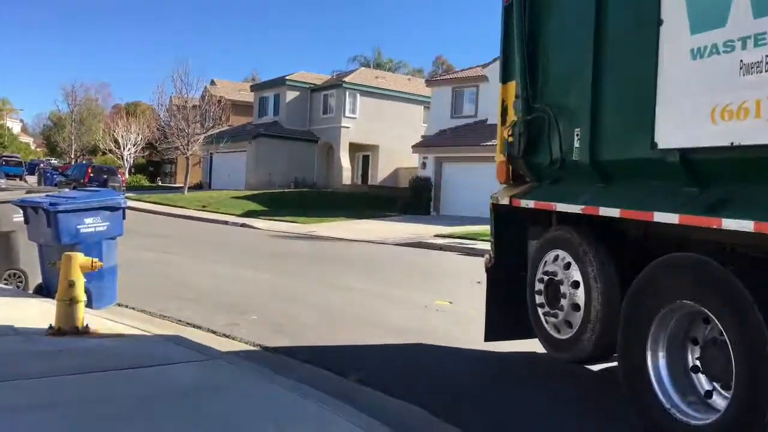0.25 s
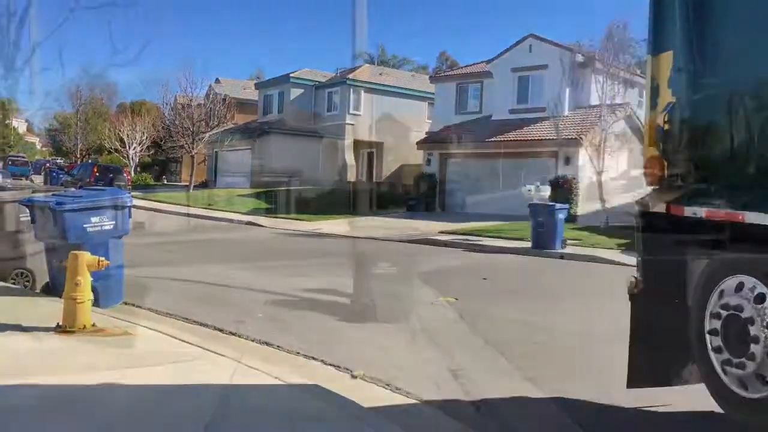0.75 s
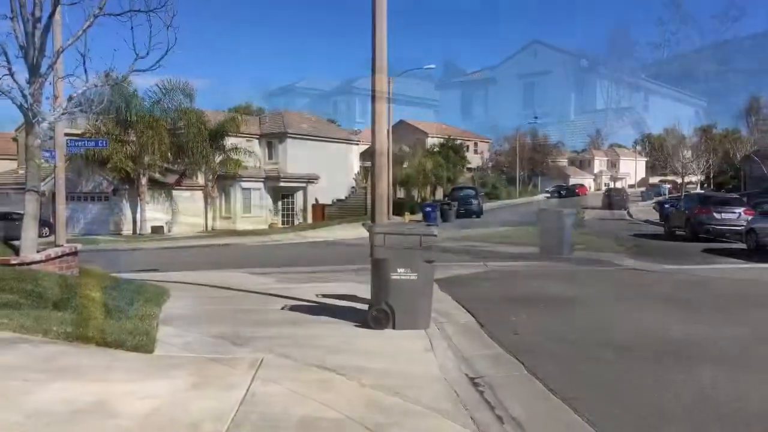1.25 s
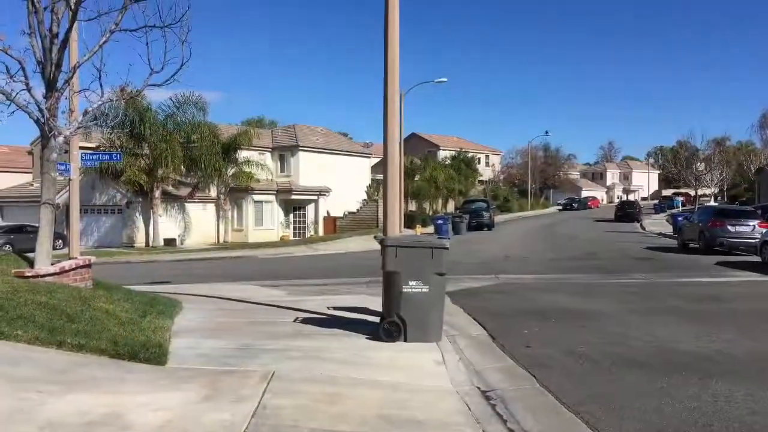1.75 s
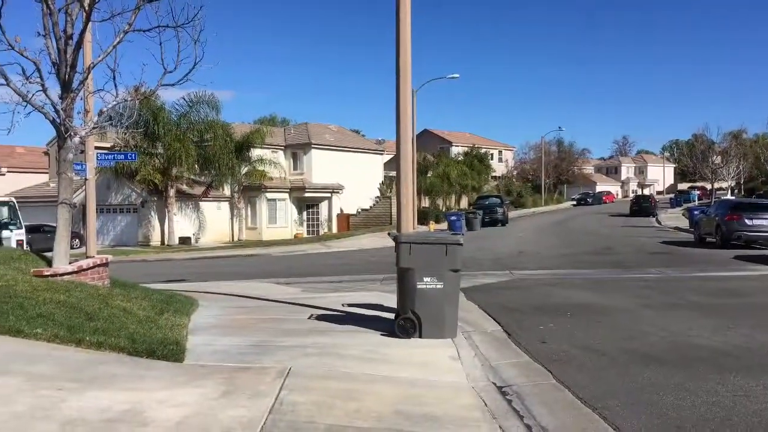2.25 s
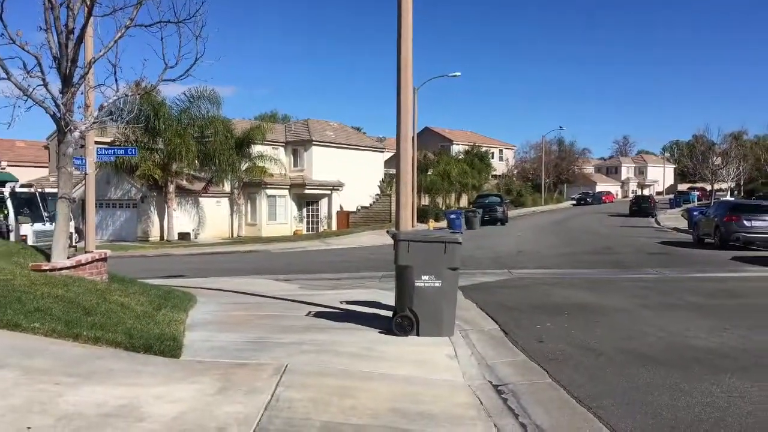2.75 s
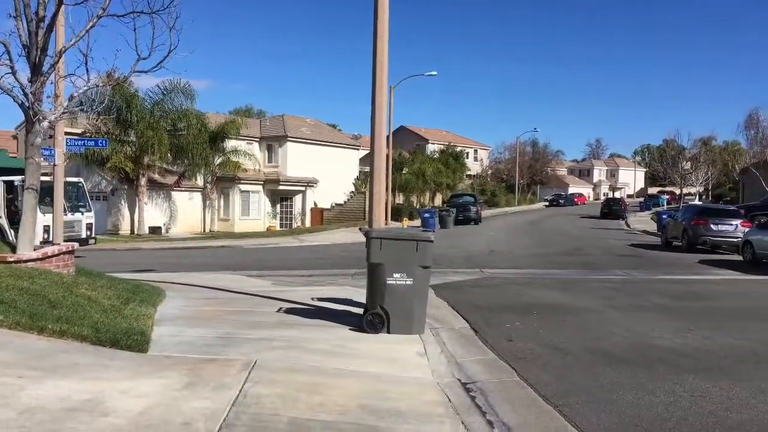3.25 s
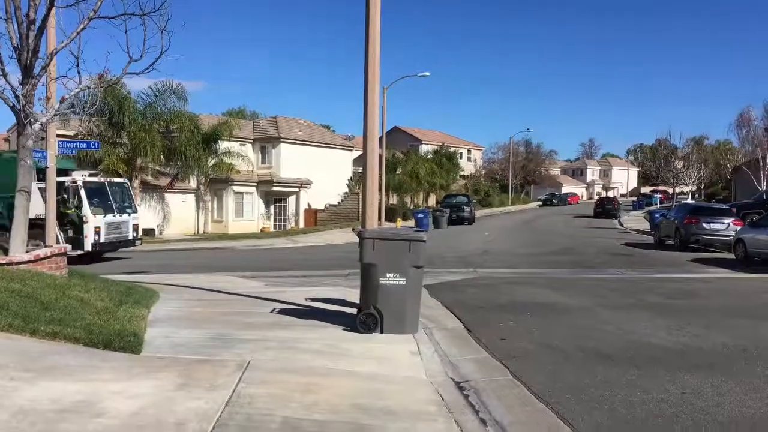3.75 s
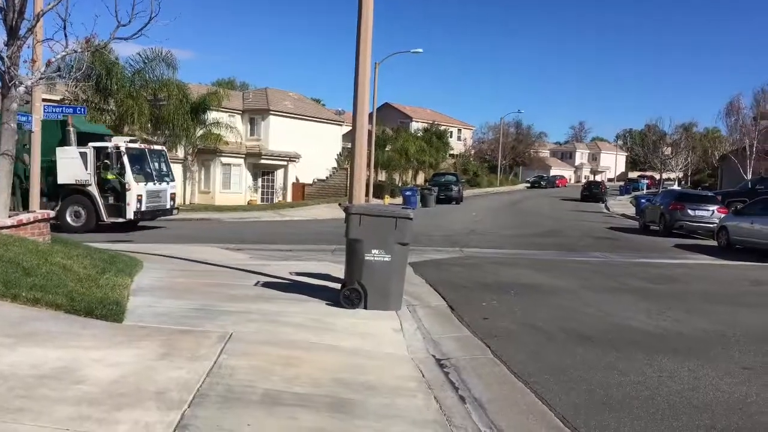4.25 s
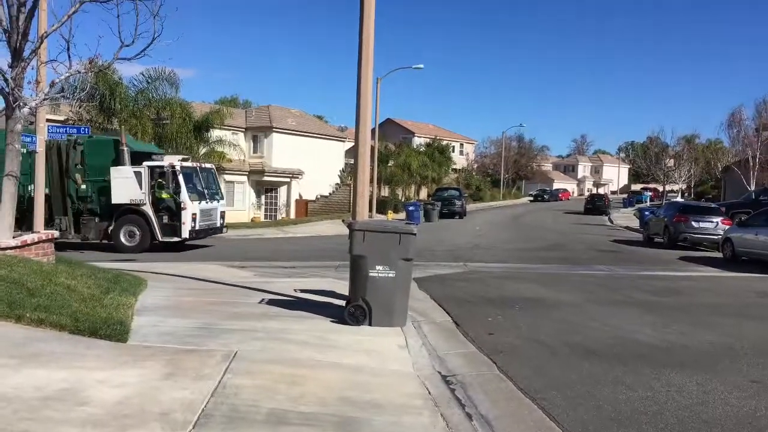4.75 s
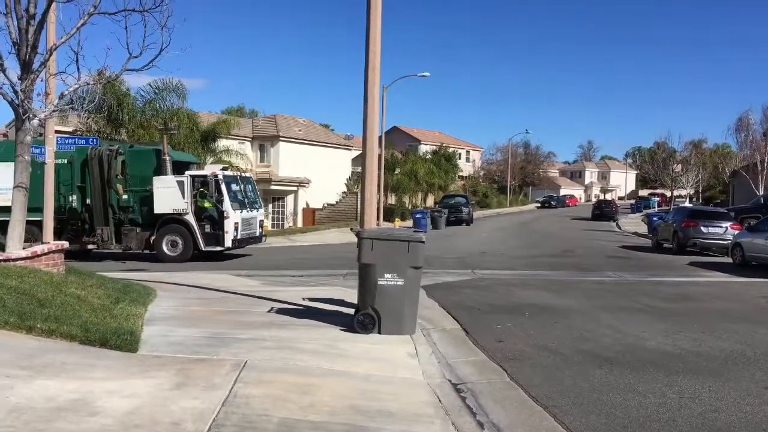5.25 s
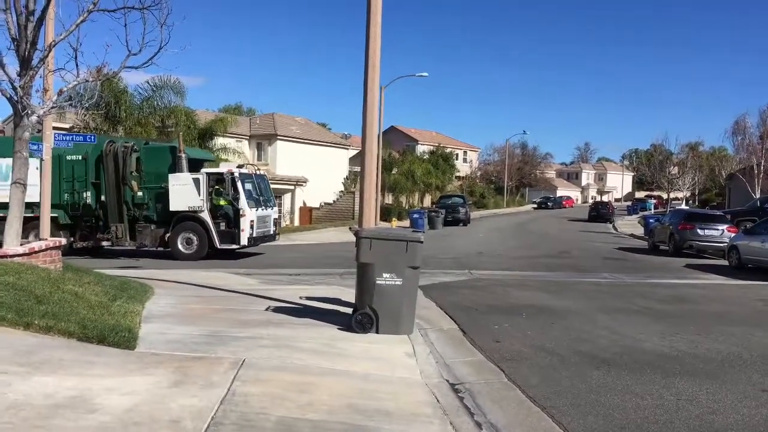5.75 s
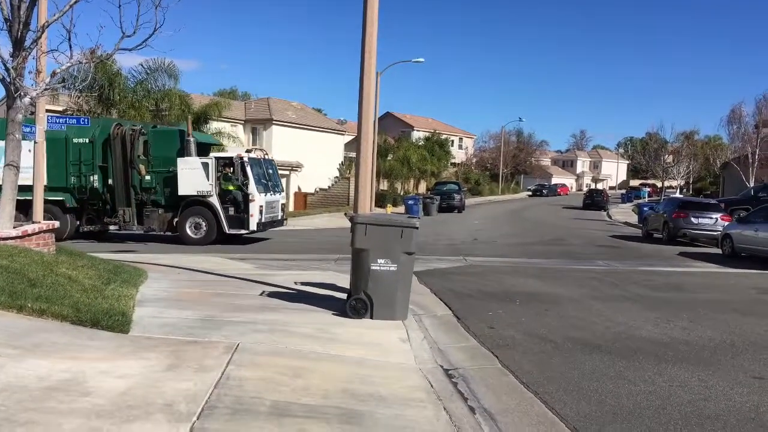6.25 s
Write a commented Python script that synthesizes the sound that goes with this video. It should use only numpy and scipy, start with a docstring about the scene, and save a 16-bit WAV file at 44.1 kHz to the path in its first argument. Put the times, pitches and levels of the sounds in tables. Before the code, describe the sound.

Close throbbing truck engine with hydraulic whine dissolves into a quieter distant diesel rolling up on a street, ending with a sharp air-brake hiss.

```python
"""A street, heard by microphone: a six-cylinder refuse truck revs up close by and fades out while
a second scene fades in: a truck engine farther off coasts, revs and rolls on.
Exhaust orders and knock follow the engine speed; the far rumble is noise with its own level curve.
Pump, gears and turbo whine as wandering tones, the body creaks by stick-slip, brakes squeal and vent air.
A low neighbourhood hum of filtered noise lies underneath."""
import sys
import numpy as np
from scipy import signal
from scipy.io import wavfile
from scipy.ndimage import uniform_filter1d, map_coordinates

SR = 44100
rng = np.random.default_rng(int(sys.argv[2]) if len(sys.argv) > 2 else 0)


def waveform_to_disk(signal):
    """Save audio, clipped to [-1, 1], as 16-bit WAV at the path in sys.argv[1]."""
    frames = np.transpose(np.atleast_2d(signal))
    scaled = np.clip(frames, -1, 1) * 32767
    samples = np.round(scaled).astype(np.int16)
    wavfile.write(sys.argv[1], SR, samples)


N = 286631
TIME_S = np.arange(N) / SR

# Every *_COLOUR table is a spectrum shape: pitch_hz [Hz], relative_level_db [dB per Hz].
# In held sounds start_s is when full level is reached; the attack comes before it.

# Background: low hum of the neighbourhood
STREET_COLOUR = [(35, -18), (55, -3.5), (90, 0.5), (150, -3), (220, -41)]
STREET_DB = -36.5

# Low body hum: time_s [s], pitch_hz [Hz], level_db [dB]
BODY_HUM = [(3.5, 122, -45), (3.72, 115, -35), (3.9, 107.4, -35.5), (4.08, 111, -31), (4.29, 119, -43),
            (4.74, 108.6, -27.5), (4.9, 105, -39), (5.0, 103.5, -30.5), (5.59, 109.9, -29.5),
            (6.0, 103.7, -31.5), (6.18, 100, -39), (6.5, 112.3, -28.5)]
# Drones of body and driveline: start_s [s], hold_s [s], first_hz [Hz], last_hz [Hz], level_db [dB]
DRONES = [(1.05, 0.033, 240, 233, -29), (1.28, .14, 231, 231, -29), (1.57, .1, 238, 230, -29.5),
          (4.7, .3, 217.4, 208, -43.5), (5.38, 0.46, 218, 218, -41.5), (6.06, 0.38, 202, 196, -44.5),
          (5.3, 0.3, 467.4, 453, -41), (5.67, .14, 460, 436, -49)]
# Driveline winding down: time_s [s], pitch_hz [Hz], level_db [dB]
GROAN = [(1.0, 292, -45), (1.096, 312.5, -29), (1.41, 290, -29.5), (1.72, 218.5, -29.5), (1.85, 186, -36)]
# Groan fundamental and octave: relative_level_db [dB]
GROAN_PARTIALS_DB = (-0.5, -17)
# Short metal knocks: start_s [s], level_db [dB], centre_hz [Hz], width_hz [Hz], t60_s [s]
METAL_TICKS = [(.045, -19, 9000, 14100, 0.023), (0.067, -22, 1300, 1500, 0.017),
               (1.56, -46, 5500, 3000, .05), (2.43, -50, 9000, 9000, 0.017)]
# Body creaks: start_s [s, onset], length_s [s], pitch_hz [Hz], slip_rate [slips per s], level_db [dB]
CREAKS = [(3.559, 0.16, 1188, 37, -40.5), (4.118, 0.17, 1166, 42, -41), (4.446, 0.071, 1270, 12, -36.5),
          (4.742, 0.17, 1160, 39, -39)]
# Hydraulic pump whines: start_s [s], hold_s [s], first_hz [Hz], last_hz [Hz], level_db [dB]
PUMP_WHINES = [(0, .1, 2468, 2464, -47), (0.212, 0.099, 2463, 2462, -36), (0.573, 0.33, 2458, 2453, -40.5),
               (1.02, 0.092, 2455, 2454, -43.5), (0, 1.12, 3081, 3070, -52), (0.64, .03, 3072, 3072, -42.5),
               (0.052, 0.56, 828, 826, -38.5), (0, 0.24, 1007, 1012, -38), (0.39, .45, 1013, 1010, -44)]
# Turbo whistles running down: start_s [s], hold_s [s], first_hz [Hz], last_hz [Hz], level_db [dB]
TURBO_WHISTLES = [(1.8, .16, 13200, 12650, -71), (1.99, .05, 13050, 12850, -67),
                  (2.13, .27, 12200, 11400, -69), (2.45, .28, 11350, 10950, -70),
                  (1.67, .52, 9650, 7550, -70), (2.32, .14, 7050, 6850, -69)]
# Brake squeals: start_s [s], hold_s [s], first_hz [Hz], last_hz [Hz], level_db [dB]
BRAKE_SQUEALS = [(.6, .02, 6650, 6650, -46), (2.38, .04, 9440, 9440, -63), (4.78, .56, 10170, 10240, -72),
                 (4.84, .3, 1547, 1553, -55), (4.82, .6, 1648, 1665, -59), (4.75, .65, 2725, 2742, -59),
                 (5.08, .15, 6575, 6585, -55), (5.28, .12, 6580, 6560, -67)]
# Brake air: start_s [s], hold_s [s], level_db [dB], release_s [s]
BRAKE_VENTS = [(5.471, 0.27, -33, 0.28), (6.424, 0.0092, -46.5, .1)]
VENT_COLOUR = [(1180, -46), (2000, -13), (2700, -6.5), (3070, -7), (3320, -8.5), (5360, -13), (6870, -8.5),
               (7480, -13), (7950, -4), (9030, -1.5), (9680, 1.5), (11200, -3), (12100, -6), (13500, -0.5),
               (15500, -5)]
VENT_ATTACK_S, LEAK_ATTACK_S, LEAK_DB = 0.032, 0.24, -15  # the valve leaks a little before it opens
VENT_SAG_DB_PER_S = 6.5  # the flow weakens as the tank empties

# Strength over the six firings, for knock and for valve ticks: relative_level_db [dB]
KNOCK_PATTERN_DB = [-0.5, -1.5, -2, -1, -1.8, -0.67]
VALVE_PATTERN_DB = [1.5, -9, -6, -15, -3, -21]

# Far engine: time_s [s], firing_hz [firings per s], firing_tone_db [dB before the fade-in]
FAR_ENGINE = [(1.15, 83.2, -28.5), (1.38, 79.04, -29), (1.51, 76.5, -18), (1.84, 73, -44), (1.93, 74, -40),
              (2.27, 70, -42), (2.36, 38, -40), (2.68, 45.5, -25), (2.85, 43.5, -33), (3.26, 50, -21),
              (3.46, 52, -50), (3.71, 71.5, -36), (3.81, 63.9, -56), (3.88, 61.9, -30),
              (3.96, 64.04, -36.5), (4.36, 73.06, -26.5), (4.57, 69.34, -43), (4.65, 66.03, -31.5),
              (5.05, 61.83, -35), (5.25, 63.64, -30.5), (5.7, 65.3, -25.5), (5.9, 63.8, -27.5),
              (6.0, 62, -41), (6.09, 61.2, -27), (6.4, 58.1, -27.5), (6.48, 61, -32)]
# Far exhaust orders: crank_multiple [times crank speed]
FAR_ORDERS = (1.5,)
# Far exhaust orders: level_db [dB before the fade-in]
FAR_ORDERS_DB = (-46.5,)
# Far engine noise: time_s [s], rumble_db, clatter_db, hiss_db [dB before the fade-in]
FAR_NOISE = [(1.3, -25, -37, -49), (1.62, -28, -42, -58), (2.11, -35, -49, -56.5),
             (2.39, -38.5, -49, -58.5), (2.59, -30.5, -46.5, -59.5), (3.0, -32, -47, -58.5),
             (3.2, -30, -46.5, -60.5), (3.6, -33, -48, -61), (3.9, -38, -49, -64), (4.2, -34.5, -47.5, -59),
             (4.65, -36.5, -46, -57.5), (4.9, -38, -48, -64), (5.4, -38.5, -44.5, -57.5),
             (6.27, -39, -47, -60.5), (6.5, -35, -41.5, -49)]
# Fade-in gain of the far engine: time_s [s], gain_db [dB]
FAR_FADE_IN = [(.6, -10.5), (.9, -3), (1.6, 1.5)]
# Combustion knock under load: start_s [s], hold_s [s], level_db [dB]
FAR_KNOCK = [(2.43, .18, -57), (2.97, 0.25, -55)]
# Gears of the far truck: pitch_hz [Hz], level_db [dB before the whine gain]
FAR_WHINES = [(3430, -68), (4040, -73), (3060, -68.5)]
# Gain that brings up the far gear whine: time_s [s], gain_db [dB]
FAR_WHINE_GAIN = [(3.9, -25), (4.5, -0.5)]
# Narrow patchy hiss around 6 kHz, in two spells: start_s [s], hold_s [s], level_db [dB], release_s [s]
SIZZLE = [(1.56, .05, -54.5, 0.64), (3.0, 0.28, -63, .1)]
# Spectra of the far rumble, drumming panels, clatter, hiss, valve ticks, combustion knock and sizzle
FAR_RUMBLE_COLOUR = [(20, -40), (45, -10), (80, -3.5), (130, -3), (170, -4.5), (250, -2), (330, -8),
                     (400, -12), (520, -24), (700, -49), (1100, -120)]
DRUM_COLOUR = [(300, -44), (450, -12), (600, -3), (720, -8.5), (1000, -41)]
FAR_CLATTER_COLOUR = [(410, -37), (700, -14), (803, -5), (913, -1.5), (1170, -6.5), (1420, -8), (1590, -10),
                      (1890, -13.5), (2770, -13.5), (4300, -23.5), (5590, -53), (9460, -120)]
FAR_HISS_COLOUR = [(2060, -33), (3500, 1.5), (3750, -15), (4040, -6.5), (4550, -8.5), (4870, -7.5),
                   (6130, -6), (7030, -11), (8960, -12), (10500, -15.5), (14100, -13), (15500, -17)]
VALVE_TICK_COLOUR = [(3000, -120), (4500, -14), (7000, -3), (9500, 0.5), (10500, -10), (12500, -6),
                     (15000, 0.5)]
FAR_KNOCK_COLOUR = [(3500, -28), (4800, -7), (6100, -2), (8000, -5), (9600, -6), (10500, -13), (15500, -14)]
SIZZLE_COLOUR = [(4500, -25), (5300, -2), (6200, -2), (7400, -8), (8200, -30), (9000, -120)]
KNOCK_AT_S, TICK_AT_S = 3.085, 5.2  # moments at which a knock and a tick peak
DRUM_DB, DRUM_RUMBLE_SHARE = -10, 0.5  # the panels follow a blend of rumble and clatter level
TICK_START_DB, TICK_RISE_DB_PER_S = -81, 3.5  # the valve tick grows steadily, before the fade-in

# Fade-out gain of the close truck: time_s [s], gain_db [dB]
CLOSE_FADE_OUT = [(0, -.5), (.65, -4.5), (1.1, -11.5), (1.5, -22), (1.8, -46)]
# Close exhaust orders: crank_multiple [times crank speed]
CLOSE_ORDERS = (2, 4, 4.5, 5, 6, 6.5, 8, 9, 10, 11, 12)
# Close exhaust orders: level_db [dB before the fade-out]
CLOSE_ORDERS_DB = (-50, -32, -40, -26, -25.5, -29, -31.5, -27.5, -25, -23.5, -37.5)
# Gears of the close truck: pitch_hz [Hz], level_db [dB before the fade-out]
CLOSE_WHINES = [(1685, -50), (1846, -43), (2019, -50), (3930, -54), (1237, -48.5)]
# Spectra of the close roar and knock
CLOSE_ROAR_COLOUR = [(18, -34), (30, -23), (70, 0), (109, -27), (214, -12), (250, -11), (291, -15),
                     (764, -21), (825, -25), (874, -16.5), (3000, -25.5), (3900, -71), (6600, -120)]
CLOSE_KNOCK_COLOUR = [(1470, -24), (2500, -17), (2600, -19), (3190, -6), (3290, -3.5), (4430, -7),
                      (4820, -11.5), (5970, -5.5), (7620, -12), (8950, -12), (9730, -8.5), (10600, -12.5),
                      (12700, -10.5), (14100, -13), (15500, -12)]
CLOSE_START_HZ, CLOSE_RISE_HZ_PER_S = 60.86, 1.7  # firing rate at the start and its rise
CLOSE_BOOM_DB, CLOSE_ROAR_DB, CLOSE_KNOCK_DB = -12, -21, -29.5  # before the fade-out

MIC_LOW_HZ, RECORDER_TOP_HZ = 31, 15680


def undb(db):
    """Decibels to gain."""
    return 10 ** (np.asarray(db) / 20)


def curves(table):
    """Columns of a table joined by straight lines at every sample."""
    s, *columns = np.transpose(table)
    return [np.interp(TIME_S, s, column) for column in columns]


def window(table, edge_s):
    """1 while the table runs, with soft ends."""
    rise = TIME_S - table[0][0]
    fall = table[-1][0] + edge_s - TIME_S
    return np.clip(np.minimum(rise, fall) / edge_s, 0, 1)


def swell(start, hold, attack, release):
    """Gain that rises until start, holds 1 and dies away."""
    rise = (TIME_S - start) / attack + 1
    fall = (start + hold - TIME_S) / release + 1
    return np.clip(np.minimum(rise, fall), 0, 1) ** 2


def walk(rate):
    """Random levels held 1 / rate s and slewed twice; spread near 1."""
    k = int(SR / rate)
    steps = np.repeat(rng.standard_normal(N // k + 1), k)
    return 1.36 * uniform_filter1d(uniform_filter1d(steps, k), k)[:N]


def noise(colour, patchy_db=0., patch_hz=150., patch_s=.08):
    """Noise of rms 1 with the given spectrum; many small resonances swell and fade in patches."""
    hz, db = np.transpose(colour)
    f, t, z = signal.stft(rng.standard_normal(N), SR, nperseg=2048)
    field = rng.standard_normal((1200, 400))
    places = np.meshgrid(f / patch_hz, t / patch_s, indexing="ij")
    patches = map_coordinates(field, places, order=1, mode="wrap")
    spectrum_db = np.interp(np.log(f + 1), np.log(hz), db, left=-120)
    gain = undb(spectrum_db[:, None] + patchy_db * patches)
    x = signal.istft(z * gain, SR)[1][:N]
    return x / np.std(x)


def tone(hz, drift, rate):
    """Sine of rms 1 whose phase wanders by drift radians."""
    phase = 2 * np.pi * np.cumsum(hz) / SR + 2 * np.pi * rng.random()
    return np.sqrt(2) * np.sin(phase + drift * walk(rate))


def glides(rows, edge_s, drift, rate, flutter_db):
    """Held tones that slide evenly in pitch, roughened by wandering phase and level."""
    out = 0
    for start, hold, first_hz, last_hz, db in rows:
        hz = first_hz * (last_hz / first_hz) ** np.clip((TIME_S - start) / hold, 0, 1)
        level = swell(start, hold, edge_s, edge_s) * undb(db + flutter_db * walk(rate))
        out = out + level * tone(hz, drift, rate)
    return out


def gear_whines(rows, flutter_db, flutter_rate, drift, drift_rate):
    """Steady gear tones, each with its own wandering level and phase."""
    return sum(undb(db + flutter_db * walk(flutter_rate)) * tone(np.full(N, 1. * hz), drift, drift_rate)
               for hz, db in rows)


def orders(firing_hz, multiples, levels_db, flutter_db):
    """Tones locked to the crank, which turns once in three firings."""
    crank_hz = firing_hz / 3
    return sum(undb(db + flutter_db * walk(7)) * tone(k * crank_hz, 0.46, 9)
               for k, db in zip(multiples, levels_db))


def throb(firing_hz, share, sharp, pattern_db, at_s):
    """A rounded puff at each firing, each cylinder with its own strength; mean power near 1."""
    turns = np.cumsum(firing_hz) / SR
    turns = turns - turns[int(at_s * SR)] + 600.4  # a puff peaks about 0.4 of the way through its firing
    count = turns.astype(int)
    scatter_db = 1.3 * rng.standard_normal(N // 100)
    size = undb(np.array(pattern_db)[count % 6] + scatter_db[count])
    puff = size * np.sin(np.pi * (turns % 1) ** 0.72) ** sharp  # rises faster than it falls
    share = np.clip(share, 0, 1)
    return np.sqrt(1 - share + share * puff ** 2 / np.mean(puff ** 2))


def neighbourhood():
    """Low neighbourhood hum: patchy noise confined to the bass."""
    return undb(STREET_DB) * noise(STREET_COLOUR + [(400, -120)], 3.2, 31.5, 0.25)


def body_hum():
    """A low body tone of wavering pitch and level as the truck rolls on."""
    hz, db = curves(BODY_HUM)
    return window(BODY_HUM, .03) * undb(db + 2.2 * walk(13)) * tone(hz, .62, 14)


def body_drones():
    """Body and driveline tones, held steady or sliding slightly."""
    return glides(DRONES, 0.064, 0.8, 16, 2.8)


def driveline_groan():
    """A rough, wavering driveline tone with an overtone."""
    hz, db = curves(GROAN)
    partials = sum(undb(part_db + 1.55 * walk(24.88)) * tone((k + 1) * hz, 0.74, 29.9)
                   for k, part_db in enumerate(GROAN_PARTIALS_DB))
    return window(GROAN, 0.027) * undb(db) * partials


def metal_ticks():
    """Short knocks of metal: decaying bursts of band noise."""
    out, t = np.zeros(N), np.arange(int(.1 * SR)) / SR
    for start, db, hz, width, t60 in METAL_TICKS:
        edges = [max(hz - width / 2, 50), min(hz + width / 2, 20000)]
        band = signal.butter(1, edges, "band", fs=SR, output="sos")
        burst = signal.sosfilt(band, rng.standard_normal(len(t)))
        first = int(start * SR)
        out[first:first + len(t)] += undb(db - 60 * t / t60) * burst / np.std(burst)
    return out


def body_creaks():
    """Stick-slip: a ringing panel, kicked at the slip rate."""
    out = 0
    for start, length, hz, slips, db in CREAKS:
        envelope = np.sin(np.pi * np.clip((TIME_S - start) / length, 0, 1)) ** 0.35
        slip_phase = (TIME_S - start) * slips % 1
        kick = np.exp(-slip_phase / 0.37)
        out = out + undb(db) * envelope * kick * tone(np.full(N, 1. * hz), 0.82, 60)
    return out


def hydraulic_pump():
    """Hydraulic pump whines: held tones, nearly steady in pitch."""
    return glides(PUMP_WHINES, 0.056, 0.72, 30, 1.6)


def turbo_whistles():
    """Turbo whistles: falling tones blurred by fast phase wander."""
    return glides(TURBO_WHISTLES, .04, 3.0, 250, 3.1)


def brake_squeals():
    """Brake squeals: high held tones with rough phase and level."""
    return glides(BRAKE_SQUEALS, 0.065, 1.36, 70, 4.2)


def brake_vent():
    """Compressed air rushing out of a brake valve."""
    flow = 0
    for start, hold, db, release in BRAKE_VENTS:
        sag_db = VENT_SAG_DB_PER_S * np.clip(TIME_S - start, 0, hold)
        rush = swell(start, hold, VENT_ATTACK_S, release)
        leak = undb(LEAK_DB) * swell(start, hold, LEAK_ATTACK_S, 2.3 * release)
        flow = flow + undb(db - sag_db) * (rush + leak)
    return flow * undb(.6 * walk(30)) * noise(VENT_COLOUR, 1.3, 310.0, 0.066)


def narrow_sizzle():
    """A narrow, patchy hiss around 6 kHz that swells up and dies away."""
    level = sum(undb(db) * swell(start, hold, .06, release) for start, hold, db, release in SIZZLE)
    return level * noise(SIZZLE_COLOUR, 4.6, 295.0, 0.066)


def far_knock(firing_hz):
    """Combustion knock under load: one puff of bright noise a firing."""
    level = sum(undb(db) * swell(start, hold, .07, 0.088) for start, hold, db in FAR_KNOCK)
    return level * throb(firing_hz, 0.85, 2.2, KNOCK_PATTERN_DB, KNOCK_AT_S) * noise(FAR_KNOCK_COLOUR)


def far_truck():
    """Firing tone and orders over rumble, drumming panels, clatter, hiss, ticks, knock and whines."""
    hz, firing_db = curves(FAR_ENGINE)
    rumble_db, clatter_db, hiss_db = curves(FAR_NOISE)
    drum_db = DRUM_DB + clatter_db + DRUM_RUMBLE_SHARE * (rumble_db - clatter_db)
    tick_db = TICK_START_DB + TICK_RISE_DB_PER_S * TIME_S

    rumble = undb(rumble_db + 0.83 * walk(6)) * noise(FAR_RUMBLE_COLOUR, 3.63, 40.0, .3)
    drum = undb(drum_db + 1.2 * walk(11)) * noise(DRUM_COLOUR)
    clatter = undb(clatter_db + 0.68 * walk(9)) * throb(hz, 0.12, 0.59, KNOCK_PATTERN_DB, KNOCK_AT_S)
    clatter = clatter * noise(FAR_CLATTER_COLOUR, 3.46, 59.93, .2)
    hiss = undb(hiss_db + 1.6 * walk(11)) * noise(FAR_HISS_COLOUR, 2.4, 356.0, .2)
    tick = undb(tick_db) * throb(hz, 0.68, 2.2, VALVE_PATTERN_DB, TICK_AT_S) * noise(VALVE_TICK_COLOUR)
    knock = far_knock(hz)
    firing = tone(hz, 0.28, 10) * undb(firing_db)
    crank = orders(hz, FAR_ORDERS, FAR_ORDERS_DB, 3.9)
    engine = firing + crank + rumble + drum + clatter + hiss + tick

    whines = undb(curves(FAR_WHINE_GAIN)[0]) * gear_whines(FAR_WHINES, 3.3, 6, 0.73, 18)
    return knock + whines + narrow_sizzle() + undb(curves(FAR_FADE_IN)[0]) * engine


def close_truck():
    """Firing boom, crank orders, whines, roar and knock, all fading together."""
    hz = CLOSE_START_HZ + CLOSE_RISE_HZ_PER_S * TIME_S
    fade_db, = curves(CLOSE_FADE_OUT)
    whines = gear_whines(CLOSE_WHINES, 3.7, 8.4, 0.97, 13.44)
    roar = undb(CLOSE_ROAR_DB + 0.86 * walk(9.1)) * throb(hz, 0.17, 0.9, KNOCK_PATTERN_DB, 0.0697)
    roar = roar * noise(CLOSE_ROAR_COLOUR, 3.2, 60.0, 0.098)
    # the knock is treble, so it fades a little faster than the rest
    knock_db = CLOSE_KNOCK_DB + 0.11 * fade_db + 0.64 * walk(13.7)
    knock = undb(knock_db) * throb(hz, 0.085, 1.1, VALVE_PATTERN_DB, 0.041)
    knock = knock * noise(CLOSE_KNOCK_COLOUR, 1.7, 304.0, 0.097)
    crank = orders(hz, CLOSE_ORDERS, CLOSE_ORDERS_DB, 3.3)
    boom = undb(CLOSE_BOOM_DB) * tone(hz, 0.25, 9.6)
    return undb(fade_db) * (boom + crank + whines + roar + knock)


def scene():
    """Street, far truck and close truck summed to one channel."""
    tones = body_hum() + body_drones() + turbo_whistles() + brake_squeals() + hydraulic_pump()
    street = neighbourhood()
    trucks = close_truck() + far_truck()
    details = driveline_groan() + body_creaks() + brake_vent() + metal_ticks()
    return (street + trucks + tones + details)[None]


def record(dry):
    """The microphone rolls off the deepest bass and the recorder cuts the top steeply."""
    low_cut = signal.butter(4, MIC_LOW_HZ, "high", fs=SR, output="sos")
    top_cut = signal.ellip(14, .2, 60, RECORDER_TOP_HZ, fs=SR, output="sos")
    return signal.sosfilt(top_cut, signal.sosfilt(low_cut, dry))


dry = scene()
out = record(dry)
waveform_to_disk(out)
```